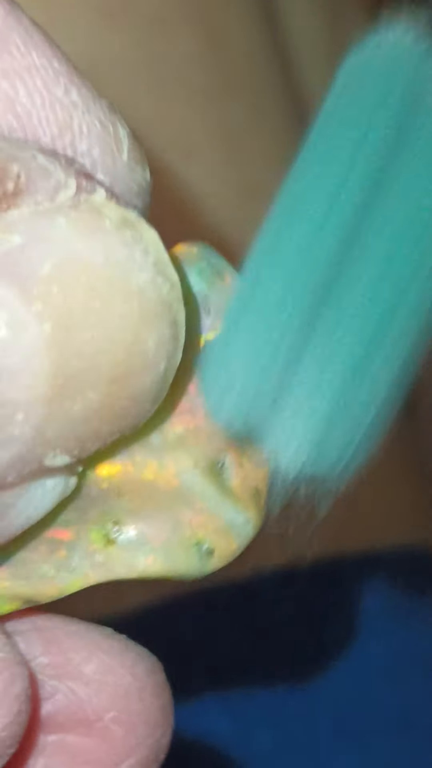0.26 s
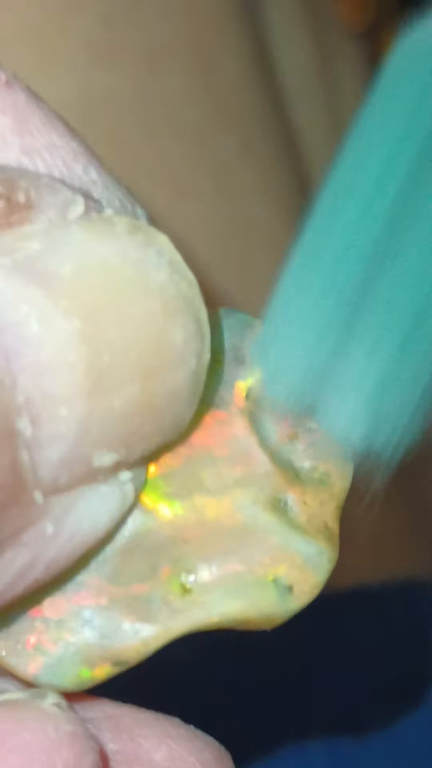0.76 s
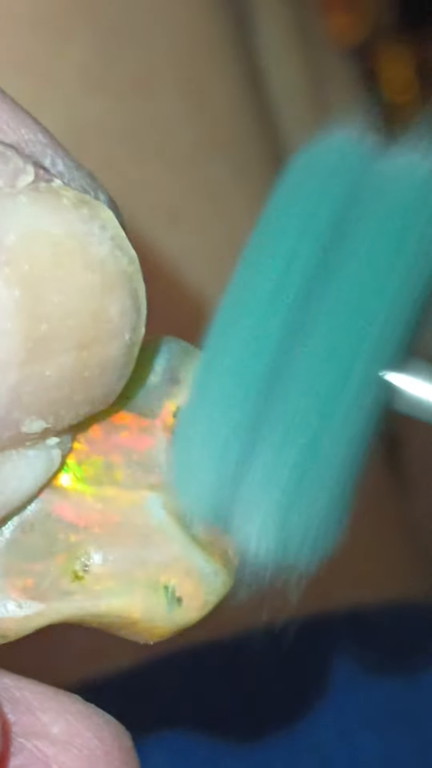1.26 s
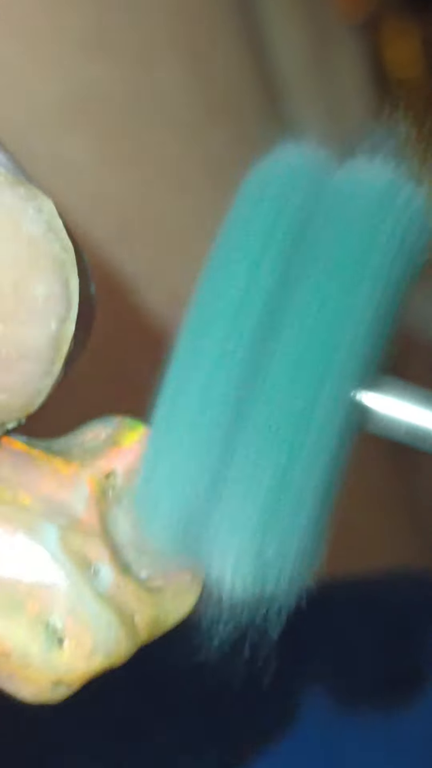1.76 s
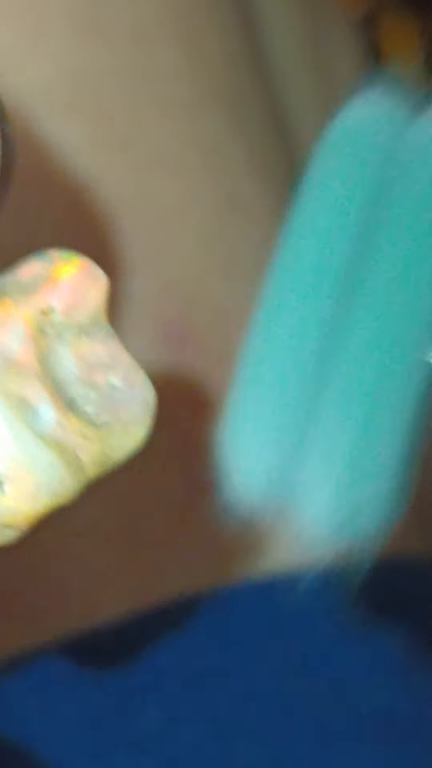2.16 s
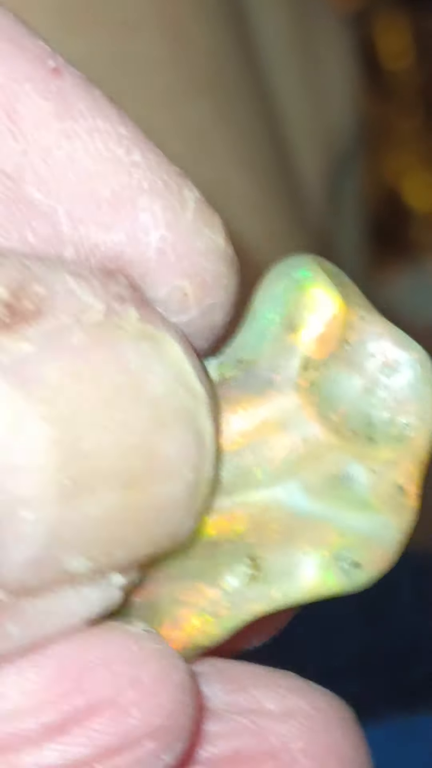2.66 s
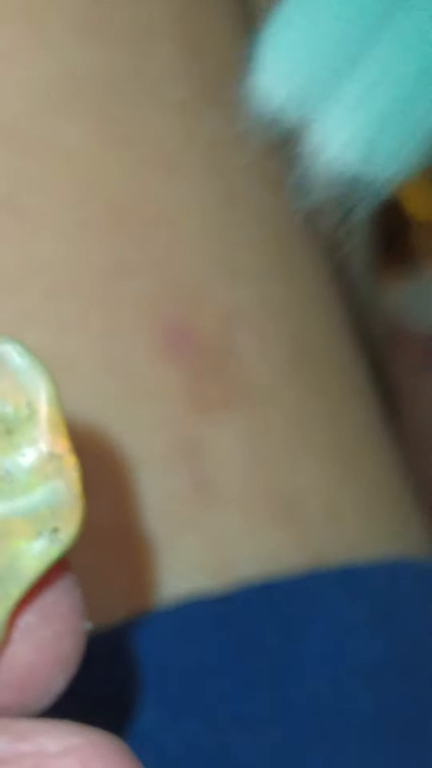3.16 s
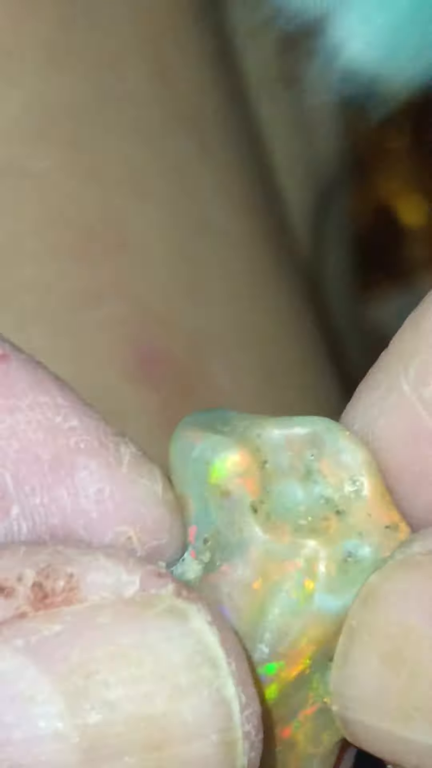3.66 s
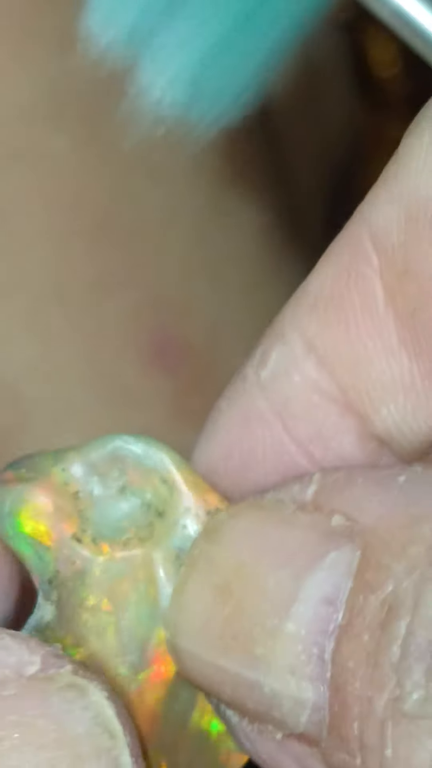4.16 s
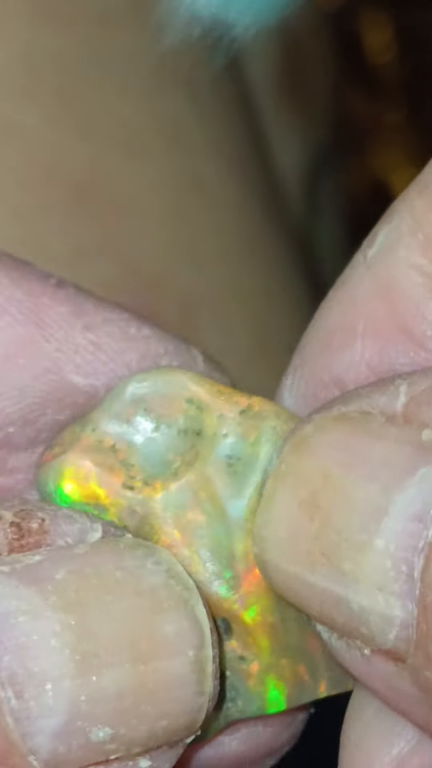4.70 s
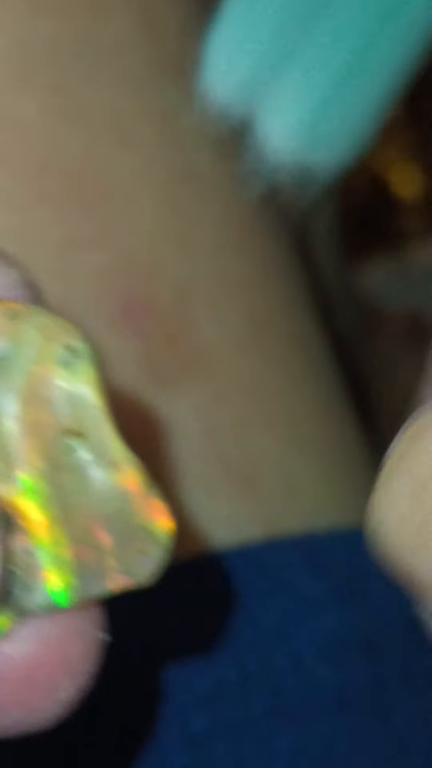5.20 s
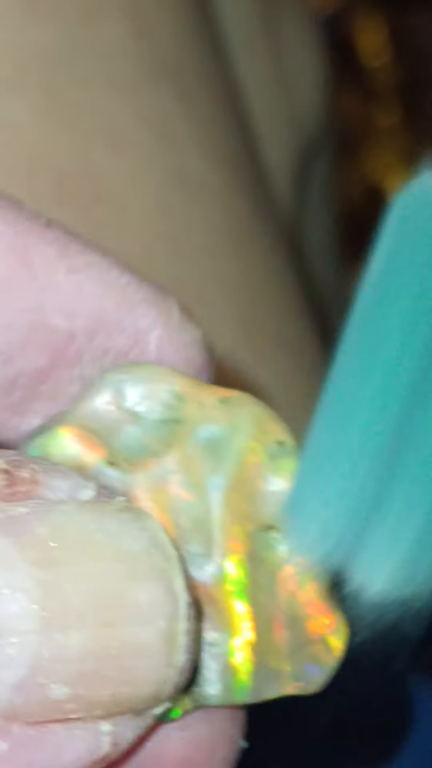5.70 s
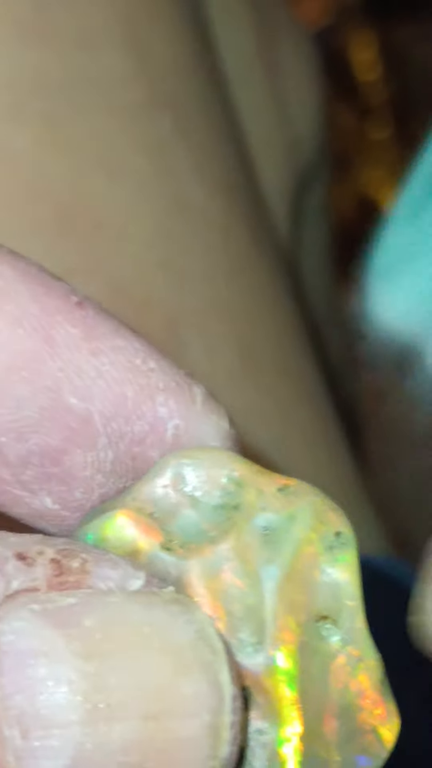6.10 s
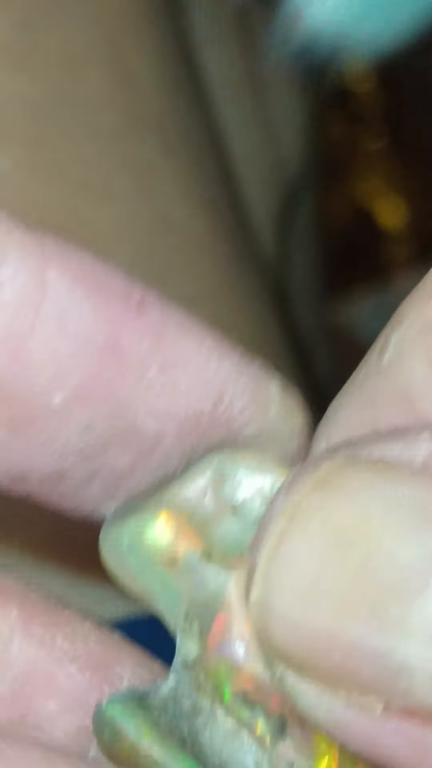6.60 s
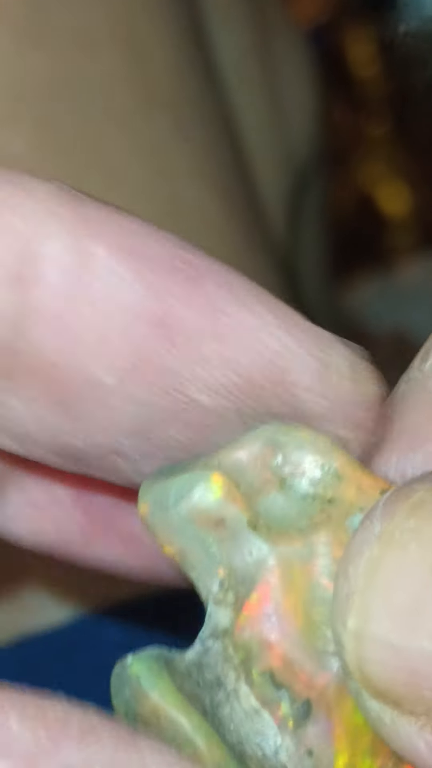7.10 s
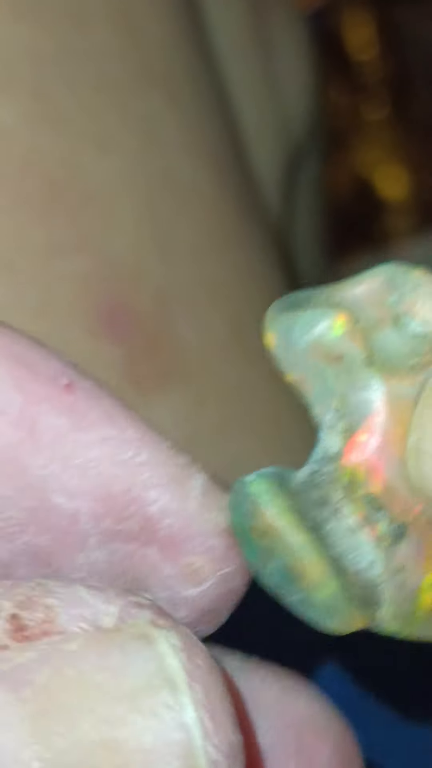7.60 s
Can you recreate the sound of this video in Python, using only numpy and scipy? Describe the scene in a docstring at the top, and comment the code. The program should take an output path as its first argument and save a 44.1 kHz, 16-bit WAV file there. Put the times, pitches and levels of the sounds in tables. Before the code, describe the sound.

A small rotary tool hums and whines as soft bristles scrape a stone, then lifts off and whirs freely with fluttering, gliding whistles.

```python
"""A small rotary tool polishes an opal with a soft bristle wheel, close to a phone with two microphone ports.
At first the wheel lies on the stone: shaft orders hum and whine unevenly and the bristles scrape in a hiss.
From about two to three and a half seconds it lifts off, speeds up and runs free, puffing air on the left port.
All along, the hollow between the hands rings in bursts of gliding pitch, made by narrow bands of tool noise.
Near the end fingers rub the stone in soft swells of resonant noise, over faint room noise and mains hum."""
import sys
import numpy as np
from scipy import signal
from scipy.fft import rfft, irfft, next_fast_len
from scipy.io import wavfile
from scipy.ndimage import uniform_filter1d, map_coordinates

SR = 44100
rng = np.random.default_rng(int(sys.argv[2]) if len(sys.argv) > 2 else 0)


def to_wav(sig):
    """Store sig (one row per channel, or 1-D mono) as 16-bit WAV at the path in sys.argv[1].

    Samples outside -1..1 are clipped; the rate is SR.
    """
    pcm = np.clip(np.atleast_2d(sig), -1, 1) * 32767
    pcm = np.round(pcm).astype(np.int16)
    wavfile.write(sys.argv[1], SR, pcm.T)  # frames by channels


N = 346185

# Mean speed of the shaft. Each row: time in seconds, turns per second.
SHAFT_SPEED = [(0.0, 173.2), (0.3, 172.7), (0.66, 169.6), (0.91, 172.2), (1.03, 172.6), (1.92, 169.7),
               (2.09, 170.4), (2.63, 176.7), (2.85, 178.3), (3.26, 180.7), (3.82, 182.7), (5.02, 184.4),
               (6.48, 184.4), (7.02, 183.7), (7.85, 183.7)]
# Phase between the two ports. Each row: frequency in Hz, radians by which the left port leads.
PORT_LEAD = [(500, 0.78), (800, 1.26), (1200, 3.36), (2000, 1.34), (2700, 4.6), (4050, 4.38), (4740, 4.65),
             (7400, 10.86), (15000, 20.6)]


def amp(db):
    """Decibels to gain."""
    return 10 ** (np.asarray(db) / 20)


def unit(x):
    """Scaled to rms 1."""
    return x / np.sqrt(np.mean(np.abs(x) ** 2) + 1e-20)


def pair(left, right):
    """A left and a right value as a column, one for each port."""
    return np.array([[left], [right]])


def along(points, hz):
    """(Hz, value) points read on a log frequency axis."""
    f, v = np.transpose(points)
    return np.interp(np.log(hz + 1), np.log(f + 1), v)


def curves(rows):
    """One value per sample for each column after the time."""
    s, *cols = np.transpose(rows)
    return np.array([np.interp(np.arange(N) / SR, s, c) for c in cols])


def wobble(rate):
    """A smooth random curve, rate knots a second."""
    at = np.linspace(0, N, 4000)
    knots = rng.standard_normal(int(N * rate / SR) + 4)
    coarse = map_coordinates(knots, [at * rate / SR])
    return np.interp(np.arange(N), at, coarse)


def filtered(x, response):
    """x shaped by a response that is a function of frequency."""
    size = next_fast_len(N + SR // 10)
    hz = np.fft.rfftfreq(size, 1 / SR)
    return irfft(rfft(x, size) * response(hz), size)[..., :N]


def angle_of(hz):
    """The running phase of a moving frequency."""
    return 2 * np.pi * np.cumsum(hz) / SR


def swell(s, length):
    """A smooth bump centred on s, down to exp(-2) one length to either side."""
    return np.exp(-2 * np.minimum(((np.arange(N) / SR - s) / length) ** 2, 20))


def tone(angle, lead):
    """A sine of rms 1 at both ports, the left leading by lead radians."""
    return np.sqrt(2) * np.array([np.sin(angle), np.sin(angle - lead)])


def rush(spectrum, patchy_db):
    """Coloured noise of rms 1 with narrow, short-lived strands of random gain, as it reaches the two ports."""
    # Likeness of the two ports. Each row: frequency in Hz, likeness from 0 to 1.
    likeness = [(100, 0.87), (500, 0.27), (1200, 0.56), (2500, 0.27), (4500, 0.75), (8000, 0.056),
                (15000, 0.15)]
    z = signal.stft(rng.standard_normal((2, N)), nperseg=1024)[2]
    strand = np.outer(np.hanning(6), np.hanning(18))
    field = signal.fftconvolve(rng.standard_normal(z.shape[1:]), strand, "same")
    patchy = z * amp(patchy_db * np.minimum(unit(field), 1.6))
    left, other = signal.istft(patchy, nperseg=1024)[1][:, :N]
    alike = lambda hz: np.clip(along(likeness, hz), 0, 1)
    shared = filtered(left, lambda hz: alike(hz) * np.exp(-1j * along(PORT_LEAD, hz)))
    separate = filtered(other, lambda hz: np.sqrt(1 - alike(hz) ** 2))
    ports = np.array([left, shared + separate])
    return unit(filtered(ports, lambda hz: amp(along(spectrum, hz))))


def level(law, handling):
    """A layer's dB at the two ports, from contact, pressure, the cup of the hands and the turn of the tool."""
    free, *changes = np.array(law)[:, :, None]
    return free + sum(change * control for change, control in zip(changes, handling))


def narrow(drive, carrier, width_hz):
    """The band of drive around a moving carrier, evened out and held at rms 1."""
    low_pass = signal.butter(3, width_hz / 2, fs=SR, output="sos")
    ring = signal.sosfilt(low_pass, drive / carrier)  # shifted down to 0 Hz
    ring /= np.sqrt(np.abs(uniform_filter1d(np.abs(ring) ** 2, size=2400)) + 1e-12)
    return unit(np.real(ring * carrier))


def resonant_swells(rows, level_db):
    """Short swells of noise, each in one resonance; each port has its own separate noise."""
    out = np.zeros((2, N))
    noise = rfft(rng.standard_normal((2, N)), next_fast_len(N))
    hz = np.linspace(0, SR / 2, noise.shape[1])
    for s, db, length, centre, width in rows:
        band = irfft(noise / (1 + ((hz - centre) / width) ** 2))[:, :N]
        out += amp(db + level_db) * swell(s, length) * unit(band)
    return out


def room(floor_db, mains_db, mains_hz):
    """Low, coloured room noise and a mains hum that wavers in pitch and level."""
    # Colour of the room noise. Each row: frequency in Hz, relative level in dB.
    room_colour = [(20, -56), (50, -50), (100, -3), (170, -4), (270, -2.5), (430, -5), (560, -40),
                   (800, -12), (2000, -36), (8000, -54)]
    # The low hum briefly dips or swells. Each row: centre in seconds, change in dB, half-length in seconds.
    hum_changes = [(.83, -9, .1), (1.058, 6, 0.24), (2.047, 7, 0.14)]
    mains = tone(angle_of(mains_hz + 1.8 * wobble(14)), lead=0) * amp(pair(-2, 1.5))
    db = mains_db + 1.9 * wobble(16) + 0.7 * wobble(3.1)
    db += sum(change * swell(s, length) for s, change, length in hum_changes)
    return amp(floor_db) * rush(room_colour, patchy_db=0) + amp(db) * mains


def finger_rubs(level_db):
    """Fingers rub the stone: soft swells of friction noise in low resonances, the same at both ports."""
    # Each row: centre in seconds, level in dB before the trim, half-length in seconds,
    # resonance in Hz, half-width in Hz.
    rubs = [(6.86, -54.5, 0.072, 510, 60.7), (6.99, -50.5, 0.032, 610, 110), (7.216, -63, 0.17, 553, 90),
            (7.602, -69, 0.072, 494, 70.3), (7.687, -62, 0.063, 640, 120), (7.77, -57.5, 0.043, 650, 130)]
    return resonant_swells(rubs, level_db)[0]


def draught(level_db, right_db, low_hz, high_hz, swirl_db, swirl_spread, swirl_hz):
    """Eddies off the wheel hit the left port: brief swings of pressure, each with a low, turbulent wake."""
    # Soft thuds. Each row: centre in seconds, level in dB before filter and trim,
    # half-length in seconds, pitch in Hz.
    puff_rows = [(.918, -43, .01, 165), (0.939, -43, 0.012, 98), (2.405, -44, .03, 115),
                 (2.462, -48, .012, 170), (2.524, -37, 0.016, 110), (2.595, -26, 0.014, 134),
                 (2.646, -28.5, 0.016, 120), (2.705, -27.5, 0.0067, 172), (2.728, -38, .02, 90),
                 (2.774, -31, .008, 110), (2.786, -29, 0.0065, 134), (2.893, -39, .012, 141),
                 (2.93, -31, 0.017, 110), (3.05, -47, 0.031, 150), (3.174, -29.5, 0.0055, 130),
                 (3.205, -37, 0.008, 130), (3.233, -38, 0.017, 99), (3.392, -35, 0.0099, 115),
                 (3.493, -35, 0.01, 190), (3.52, -43, .02, 90), (3.591, -49, 0.047, 90),
                 (4.38, -46, .012, 120), (4.435, -36.5, .014, 99), (4.465, -39, 0.0092, 135),
                 (4.532, -31, 0.0084, 104.4), (4.565, -32, 0.0088, 129), (4.588, -32.5, 0.013, 213),
                 (4.665, -37.5, 0.033, 127), (4.744, -37, .014, 90), (4.777, -38, .014, 90),
                 (4.802, -33, 0.0099, 100), (4.82, -34, 0.0054, 139), (4.895, -42, .014, 100),
                 (5.181, -53, .02, 90), (5.347, -51, 0.023, 100), (5.764, -55, .014, 90),
                 (5.862, -52, .012, 95)]
    thuds, swirl = np.zeros(N), np.zeros(N)
    t = np.arange(N) / SR
    for s, db, length, hz in puff_rows:
        near = slice(max(int((s - .2) * SR), 0), int((s + .2) * SR))
        u = t[near] - s
        swing = np.sin(2 * np.pi * (hz * u + rng.uniform()))
        thuds[near] += amp(db) * np.exp(-2 * (u / length) ** 2) * swing
        # the wake comes a little later and lasts longer
        wake_shape = np.exp(-2 * ((u - length / 2) / (swirl_spread * length)) ** 2)
        swirl[near] += amp(db + swirl_db) * wake_shape
    band = lambda hz: 1 / np.sqrt((1 + (low_hz / (hz + 1)) ** 6) * (1 + (hz / high_hz) ** 6))
    wake_colour = lambda hz: band(hz) / (1 + (hz / swirl_hz) ** 2)
    wake = unit(filtered(rng.standard_normal(N), wake_colour))
    air = filtered(thuds + swirl * wake, band)
    return amp(level_db) * air * amp(pair(0, right_db))


def faint_tones(contact, level_db):
    """Thin, slightly wavering tones between the shaft orders, heard once the wheel runs free."""
    # Each row: pitch in Hz, level in dB before the trim.
    thin_tones = [(270, -72), (941, -75), (1178, -83)]
    out = np.zeros((2, N))
    for hz, db in thin_tones:
        out += amp(db + level_db) * tone(angle_of(hz + wobble(8)), along(PORT_LEAD, hz))
    return (1 - contact) * out


def bright_swells(level_db):
    """Bright hiss swells briefly near 4.7 to 5 kHz as the hands shift: noise in one resonance each."""
    # Each row: centre in seconds, level in dB before the trim, half-length in seconds,
    # resonance in Hz, half-width in Hz.
    swell_rows = [(1.95, -55, 0.1, 5000, 50), (3.3, -51, 0.36, 4670, 180), (6.9, -52.5, 0.41, 4700, 170)]
    return resonant_swells(swell_rows, level_db)


def tool_noise(shaft, tonal, rough):
    """What stirs the hollow: broad noise with the middle shaft orders in it."""
    lines = np.zeros(N)
    for order in range(11, 19):
        lines += np.sin(order * shaft + rough * wobble(40) + rng.uniform(0, 2 * np.pi))
    return rng.standard_normal(N) + tonal * lines


def hollow(drive, level_db, flutter_db, stray_hz, apart, core_hz, core):
    """The gap between the hands picks gliding bands out of the tool's noise, each with a whistling core."""
    # Bursts, some overlapping. Each row: start and end in seconds, first and last pitch in Hz,
    # bandwidth in Hz, left and right level in dB before trim and flutter.
    burst_rows = [(0, 0.108, 2060, 2040, 150, -48, -44), (0, 0.373, 3065, 3056, 260, -48.5, -57),
                  (0.192, 0.357, 2070, 2030, 150, -50, -49), (0.42, 0.59, 2950, 3030, 240, -49, -66.0),
                  (0.558, 0.718, 2696, 2670, 302, -47, -43.5), (1.105, 1.222, 2730, 2760, 150, -66.0, -48),
                  (1.653, 1.75, 2750, 2720, 220, -45, -54.5), (1.764, 1.833, 2000, 2000, 79, -58.0, -45.5),
                  (1.804, 1.977, 2680, 2710, 340, -44, -54), (2.38, 2.617, 2806, 2850, 110, -58, -51),
                  (2.52, 2.72, 2110, 2120, 50, -60, -49.5), (2.564, 2.65, 1930, 1890, 180, -55.0, -51),
                  (2.699, 2.86, 2085, 2120, 170, -46.5, -39), (2.852, 3.08, 2145, 2164, 90, -48, -40.5),
                  (2.896, 3.264, 2304, 2357, 200, -72, -38), (3.14, 3.207, 2520, 2570, 120, -66.0, -42.0),
                  (3.255, 3.31, 2300, 2450, 150, -52, -46), (3.295, 3.36, 2486, 2564, 121, -36, -39.5),
                  (3.35, 3.805, 2587, 2440, 192, -40, -57), (3.53, 3.79, 2380, 2320, 103, -40, -40.5),
                  (3.797, 3.973, 2597, 2587, 90.5, -36.5, -47), (3.943, 4.203, 2726, 2700, 200, -59, -37),
                  (3.974, 4.2, 2570, 2530, 101, -46.5, -69), (4.193, 4.304, 2606, 2550, 110, -37.5, -34.0),
                  (4.312, 4.368, 2500, 2500, 180, -42, -45.5), (4.419, 4.482, 2600, 2560, 120, -41, -46),
                  (4.524, 4.667, 2540, 2650, 190, -38, -46), (4.705, 4.767, 2460, 2435, 100, -36.5, -41),
                  (4.783, 4.845, 2440, 2390, 108, -41.5, -46), (4.865, 4.918, 2440, 2480, 120, -37.5, -43),
                  (4.91, 5.29, 2590, 2636, 240, -42.5, -46), (5.29, 5.347, 2580, 2300, 150, -55, -47),
                  (5.364, 5.893, 2130, 2143, 260, -74, -40), (5.407, 5.455, 2260, 2220, 160, -62, -40),
                  (5.545, 6.15, 2790, 2760, 300, -66.0, -51.5), (5.9, 6.016, 2130, 2150, 110, -47, -36.5),
                  (6.036, 6.154, 2140, 2300, 110, -64, -43.5), (6.17, 6.205, 2270, 2440, 130, -60, -48),
                  (6.182, 6.443, 2660, 2580, 168, -42, -43.5), (6.249, 6.319, 2780, 2730, 90, -49, -35.5),
                  (6.452, 6.679, 2607, 2490, 227.5, -41, -46), (6.488, 6.673, 2810, 2780, 100, -53, -42),
                  (6.575, 7.386, 2366, 2395, 129, -39, -41.5), (6.68, 6.827, 2490, 2440, 130, -39.5, -49),
                  (6.95, 7.85, 2660, 2800, 516, -60, -47), (6.965, 7.13, 2460, 2450, 129, -40.5, -56),
                  (7.19, 7.379, 2590, 2610, 150, -52, -49), (7.293, 7.394, 2470, 2410, 110, -49.5, -51),
                  (7.452, 7.853, 2650, 2820, 553, -50, -61)]
    later = filtered(drive, lambda hz: np.exp(-1j * along(PORT_LEAD, hz)))  # the right port hears it later
    ports = np.array([drive, later]) + apart * rng.standard_normal((2, N))
    out = np.zeros((2, N))
    for start, end, first_hz, last_hz, width_hz, left_db, right_db in burst_rows:
        edge = abs(0.023 + 0.1 * (end - start))  # fade time in seconds, longer for a long burst
        span = slice(max(int((start - edge) * SR), 0), min(int((end + edge) * SR), N))
        t = np.arange(span.start, span.stop) / SR
        gate = np.clip(np.minimum(t - start, end - t) / edge + .5, 0, 1)
        hz = np.interp(t, [start, end], [first_hz, last_hz]) + stray_hz * wobble(30)[span]
        carrier = np.exp(1j * angle_of(hz))
        body = narrow(ports[:, span], carrier, width_hz)
        whistle = narrow(ports[:, span], carrier, core_hz)
        flutter = flutter_db * np.tanh(1.44 * wobble(55)[span])
        gain = amp(pair(left_db, right_db) + level_db + flutter)
        out[:, span] += gate * gain * unit(body + core * whistle)
    return out


def wheel(shaft, handling, sanding_db, free_db, fizz_db, casing_db, beat, drift_db, flutter_db):
    """Bristles scrape the stone or beat the air in a fluttering rush, with an uneven pulse twice a turn."""
    # Levels of the rush and of the finest hiss. Each row: left and right dB before the trims; the first
    # row is running free with open hands, then come the changes at full contact, per unit of pressure,
    # with hands fully cupped and with the tool fully turned aside.
    air_law = [(-49, -46), (1, 0.5), (0.5, -0.5), (2, -2), (1.5, 0)]
    fizz_law = [(-58.5, -53.5), (5.5, 0), (4, 1.5), (6, 1.5), (3, 1)]
    # Colours of the scrape, free whirr, fine hiss and casing rattle.
    # Each row: frequency in Hz, relative level in dB.
    scrape_colour = [(400, -25), (1000, -27), (1700, -2.5), (2100, 0.5), (2450, 1.5), (2800, 4),
                     (3350, -6.5), (4400, -2), (5400, 1.5), (6500, -2.5), (7200, 0), (7650, -12.5),
                     (8500, -9), (11000, -14.5), (14000, -30)]
    whirr_colour = [(400, -36), (1000, -18), (1700, -3.5), (2100, 1.5), (2900, 2), (3400, -1.5),
                    (4500, -0.5), (5600, -1), (6600, 0.5), (7400, -8.5), (8500, -12), (11000, -15),
                    (14000, -21)]
    fizz_colour = [(9000, -19), (13500, -14.5), (14300, -11), (14900, -2.5), (15800, -4.5), (17000, -11)]
    rattle_colour = [(200, -33), (520, -16.5), (700, -0.5), (880, -6), (1040, -10), (1400, 3), (1800, -7),
                     (2300, -22), (4000, -46)]
    contact = handling[0]
    scrape_db = sanding_db + 0.9 * wobble(35) + 0.9 * wobble(150)
    scrape = amp(scrape_db) * rush(scrape_colour, patchy_db=3.3)
    whirr = amp(free_db + 0.79 * wobble(25)) * rush(whirr_colour, patchy_db=4.0)
    hiss_db = level(air_law, handling) + drift_db * wobble(5.5) + flutter_db * wobble(60)
    hiss = amp(hiss_db) * (np.sqrt(contact) * scrape + np.sqrt(1 - contact) * whirr)
    fine_db = level(fizz_law, handling) + fizz_db + 0.83 * wobble(43) + 0.28 * wobble(9)
    fizz = amp(fine_db) * rush(fizz_colour, patchy_db=2.5)
    rattle = amp(casing_db - 0.5 * contact) * rush(rattle_colour, patchy_db=4.0)  # a touch softer on the stone
    pulse = np.cos(shaft) ** 8 * amp(4 * wobble(120))
    return (hiss + fizz + rattle) * unit(1 + beat * pulse)


def motor(shaft, handling, wander_db, rough, scrape_rough, hum_db, octave_db, whine_db, whine_left_db,
          tremble_db, shudder_db, snag_db, waver_db, surge_db, loaded_db):
    """Sines at orders of the shaft; each swells and fades, and breaks up more while the bristles drag."""
    # Level of order 2. Each row: left and right dB before the trim; the first row is running free with
    # open hands, then come the changes at full contact, per unit of pressure, with hands fully cupped
    # and with the tool fully turned aside.
    hum_law = [(-49.5, -40.5), (2.5, -0.5), (-4.5, -5), (9, -2.5), (-1.5, -5)]
    # Order 4. Each row: time in seconds, left and right level in dB before trim and waver.
    octave_rows = [(0, -66, -62), (.25, -57, -66), (.4, -68, -57.5), (.7, -65, -64), (.8, -46, -51),
                   (.92, -65, -64.5), (1.95, -74, -71), (2.1, -59.5, -65), (2.4, -56.5, -56.5),
                   (3.3, -59, -56.5), (4.7, -63.5, -56.5), (5.3, -57, -53.5), (5.8, -49.5, -57),
                   (6.4, -60, -52), (6.95, -53, -51.5), (7.85, -65, -58)]
    # Order 32. Each row: time in seconds, level in dB before trims and wobble.
    whine_rows = [(0.0, -58), (0.43, -45.5), (0.68, -54), (0.85, -53), (1.08, -57), (1.29, -44.5),
                  (1.56, -61), (2.1, -58), (2.24, -48.5), (2.45, -51), (2.65, -49), (2.89, -53.5),
                  (3.19, -38), (3.28, -49), (3.37, -41.5), (3.58, -51.5), (4.08, -37.5), (4.87, -51.5),
                  (6.02, -50), (6.49, -58), (6.95, -41.5), (7.85, -41.5)]
    # The other orders. Each entry: shaft order, then left and right dB on the stone and left and right dB
    # running free, before trim, wander and snags.
    order_levels = {1: (-79, -75, -68.5, -68), 3: (-96, -81, -74, -73), 5: (-66, -66, -68, -71),
                    6: (-69, -65, -70, -60.5), 7: (-65, -65, -85, -64), 8: (-53, -48.5, -67, -55.5),
                    9: (-74, -74, -60.5, -57.5), 10: (-61, -58.5, -74, -68), 11: (-79, -69, -57, -60.5),
                    12: (-84, -55, -60, -68), 14: (-65, -57.5, -53, -54), 16: (-55.5, -57, -79, -53.5),
                    16.65: (-75, -75, -63, -62), 18: (-55, -62, -69, -64), 20: (-62, -58.5, -66.5, -59.5),
                    22: (-53.5, -62, -80, -52.5), 24: (-55.5, -68, -61, -57.5), 26: (-65, -53, -60, -59),
                    28: (-59, -60, -79, -77), 30: (-56, -71, -83, -57.5), 34: (-59, -70, -73, -76),
                    36: (-80, -57, -64, -60), 42: (-73, -56, -89, -89), 58: (-81, -76, -87, -67)}
    # One order surges as the tool shifts in the hand. Each row: centre in seconds, half-length in seconds,
    # shaft order, left and right level in dB before trim, wander and snags.
    surge_rows = [(.33, 0.43, 18, -45, -50), (.08, 0.27, 22, -51.5, -55), (0.4, .2, 22, -50, -50),
                  (.48, .14, 26, -56, -46), (0.86, 0.081, 26, -62, -45), (1.15, 0.24, 22, -55, -53),
                  (0.766, 0.15, 10, -60, -48), (.97, 0.17, 10, -47, -66), (1.124, 0.37, 24, -59, -46),
                  (1.317, 0.29, 26, -60, -47.5), (1.517, 0.14, 20, -46, -57), (1.78, 0.53, 16, -49, -62),
                  (1.96, .32, 30, -51, -49), (2.908, 0.34, 12, -63, -39), (3.297, 0.33, 22, -72, -47.5),
                  (3.41, 0.12, 8, -48.5, -58), (3.22, .14, 9, -53, -50.5), (3.526, 0.052, 9, -50, -48),
                  (3.48, .35, 24, -60, -49), (3.56, 0.11, 10, -57, -46), (4.392, .2, 11, -49, -51),
                  (4.946, 0.54, 22, -71, -49.5), (6.065, 0.23, 6, -65, -51), (6.886, 0.13, 11, -54, -46.5),
                  (7.8, 0.45, 22, -68, -47.5)]
    contact = handling[0]
    shake_db = tremble_db * wobble(23) + shudder_db * (0.3 + 0.43 * contact) * wobble(100)
    out = amp(level(hum_law, handling) + hum_db + shake_db) * tone(2 * shaft, lead=0.19)

    octave_waver = waver_db * np.array([wobble(10), wobble(12)])
    out += amp(curves(octave_rows) + octave_db + octave_waver) * tone(4 * shaft, lead=1.0)

    whine_level = curves(whine_rows) + whine_db + wobble(13) + pair(whine_left_db, 0)
    whine_angle = 32 * shaft + (.15 + scrape_rough * contact) * wobble(83)
    out += amp(whine_level) * tone(whine_angle, lead=np.pi / 2)

    for order, levels in order_levels.items():
        loaded, free = np.reshape(levels, (2, 2, 1))
        gain = amp(contact * (loaded + loaded_db) + (1 - contact) * free)
        for s, length, which, left_db, right_db in surge_rows:
            if round(which) == order:
                surge = amp(surge_db + pair(left_db, right_db)) * swell(s, length)
                gain = np.maximum(gain, surge)
        db = wander_db * (np.tanh([wobble(7), wobble(7)]) - .4)
        # bristles catch and let go
        db += snag_db * (.5 + .5 * contact) * (np.tanh(2.4 * wobble(30)) - .3)
        jitter = rough * wobble(70) + scrape_rough * contact * wobble(160)
        angle = order * shaft + jitter + rng.uniform(0, 2 * np.pi)
        lead = along(PORT_LEAD, order * SHAFT_SPEED[-1][1])
        out += gain * amp(db) * tone(angle, lead)
    return out


def scene():
    """The shaft runs slower and less evenly while the wheel touches the stone; the hands steer the levels."""
    # The wheel lies on the stone, then lifts off. Each row: time in seconds, contact from 0 to 1.
    contact_rows = [(0, 1), (2.2, 0.87), (2.6, 0.57), (3.1, 0.13), (3.5, 0.018)]
    # Each row: time in seconds, pressure on the stone (0 usual, 1 bearing down, -1 easing off).
    pressure_rows = [(0, -0.096), (.52, 0.48), (.615, 1.8), (.72, -0.51), (.85, -0.54), (.96, 0.45),
                     (1.1, 0.39), (1.65, 0.65), (1.94, 0.46), (2.04, -0.29), (2.15, 0.23), (2.29, -0.44),
                     (2.41, 0.37), (2.55, -0.14), (2.68, 0.26), (3.1, -0.16)]
    # Each row: time in seconds, how closely the hands cup the stone (0 open, 1 closed).
    cup_rows = [(0, 0.24), (2.55, 0.31), (3.1, 0.43), (3.35, 0.98), (4.9, 0.86), (5.3, 0.76), (5.68, 0),
                (6.05, 0.45), (6.35, 0.89), (7.25, 0.88), (7.85, 0.62)]
    # Each row: time in seconds, how far the tool is turned aside from 0 to 1.
    turned_rows = [(6.65, 0), (6.9, 0.57), (7.85, 0.34)]
    contact = np.clip(curves(contact_rows)[0], 0, 1)
    handling = contact, curves(pressure_rows)[0], curves(cup_rows)[0], curves(turned_rows)[0]
    unsteady = (0.031 + 0.553 * contact) * wobble(25.09)  # turns per second
    shaft = angle_of(curves(SHAFT_SPEED)[0] + unsteady)

    background = room(floor_db=-65.0, mains_db=-63.0, mains_hz=120.0)
    fingers = finger_rubs(level_db=3.0)
    puffs = draught(level_db=-1.0, right_db=-32, low_hz=58, high_hz=300,
                    swirl_db=-11.5, swirl_spread=2.1, swirl_hz=110)
    tool = faint_tones(contact, level_db=0.5) + bright_swells(level_db=3.5)
    tool += hollow(tool_noise(shaft, tonal=0.099, rough=0.78), level_db=0.12, flutter_db=2.5,
                   stray_hz=16.5, apart=0.43, core_hz=60, core=0.29)
    tool += wheel(shaft, handling, sanding_db=2.0, free_db=3.0, fizz_db=3.5, casing_db=-57.5,
                  beat=0.19, drift_db=0.23, flutter_db=0.63)
    tool += motor(shaft, handling, wander_db=3.5, rough=0.26, scrape_rough=0.35, hum_db=-0.06,
                  octave_db=-2.5, whine_db=-1.0, whine_left_db=-22, tremble_db=0.47, shudder_db=1.0,
                  snag_db=4.0, waver_db=2.5, surge_db=0.6, loaded_db=0.4)
    return background + fingers + puffs + tool


def record(dry):
    """The phone passes nothing from its band limit of 15.9 kHz upward."""
    return filtered(dry, lambda hz: hz < 15900)


dry = scene()
out = record(dry)
to_wav(out)
```